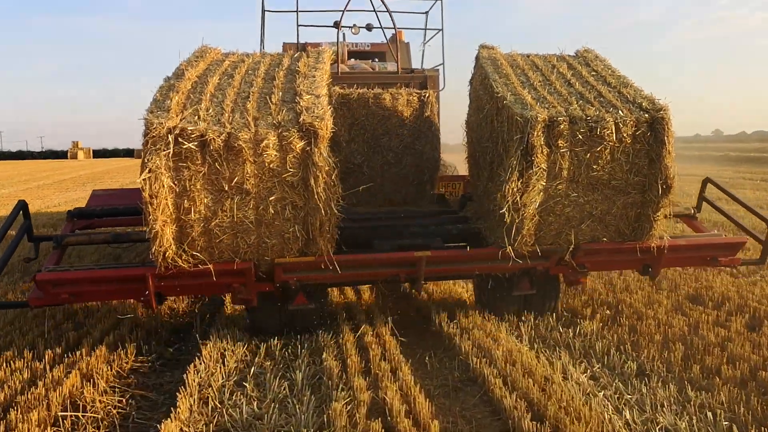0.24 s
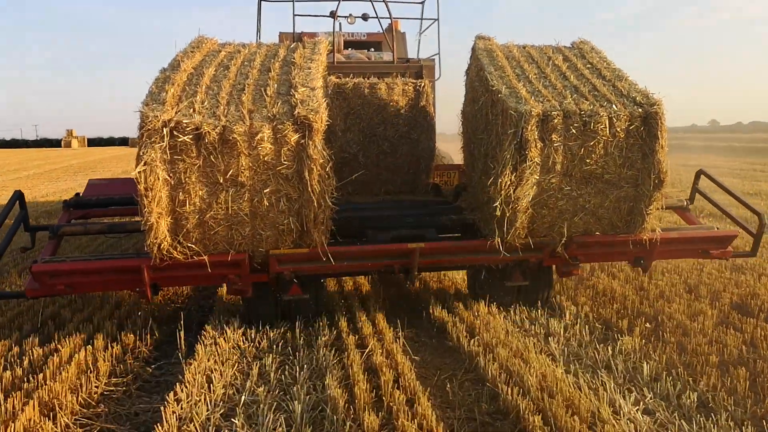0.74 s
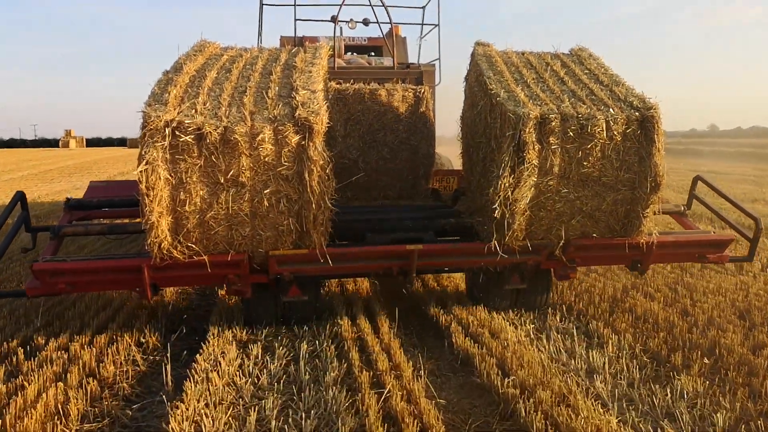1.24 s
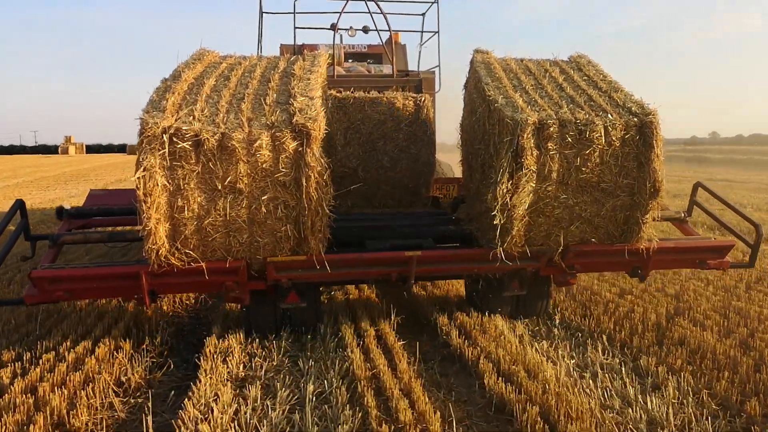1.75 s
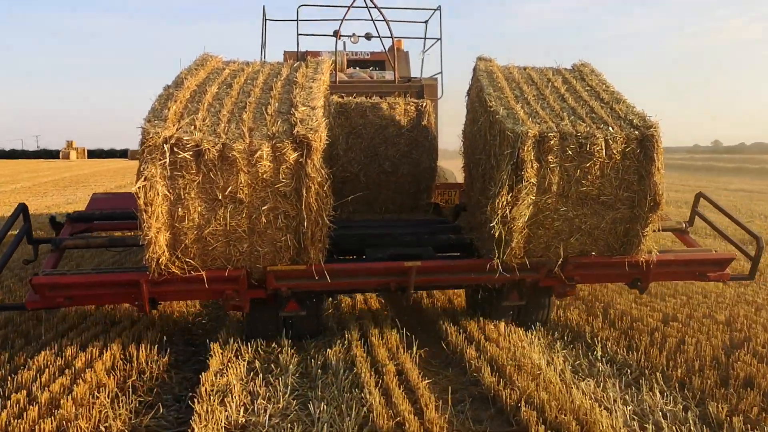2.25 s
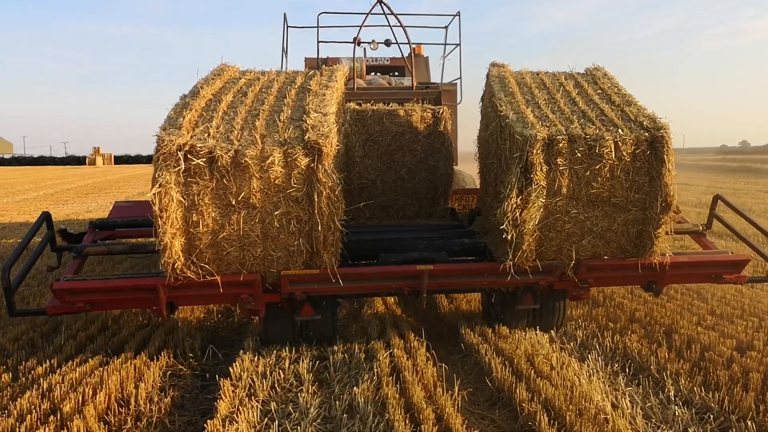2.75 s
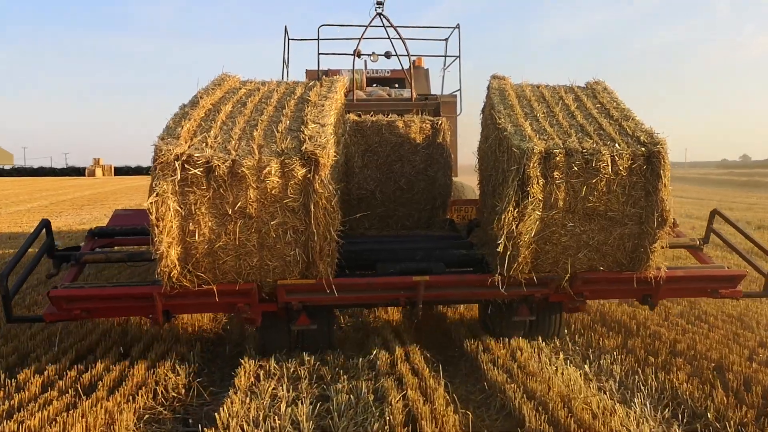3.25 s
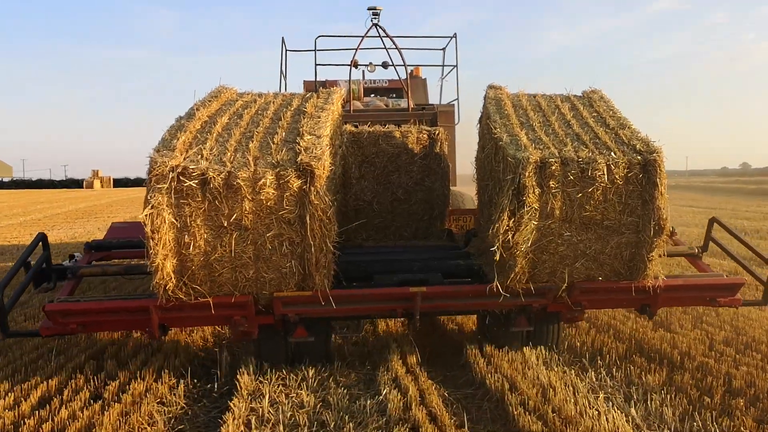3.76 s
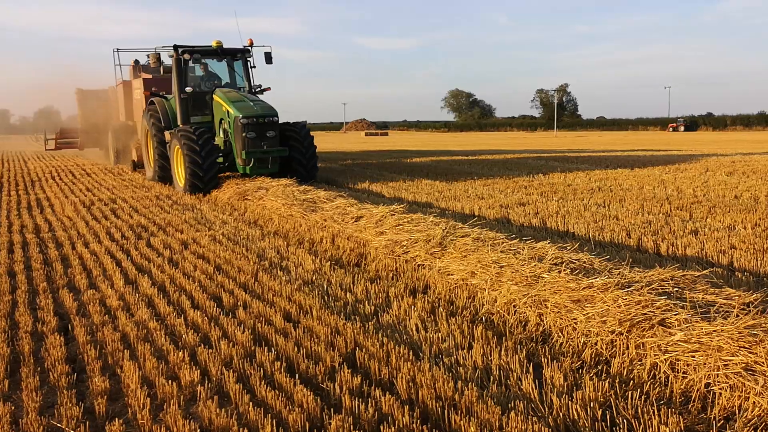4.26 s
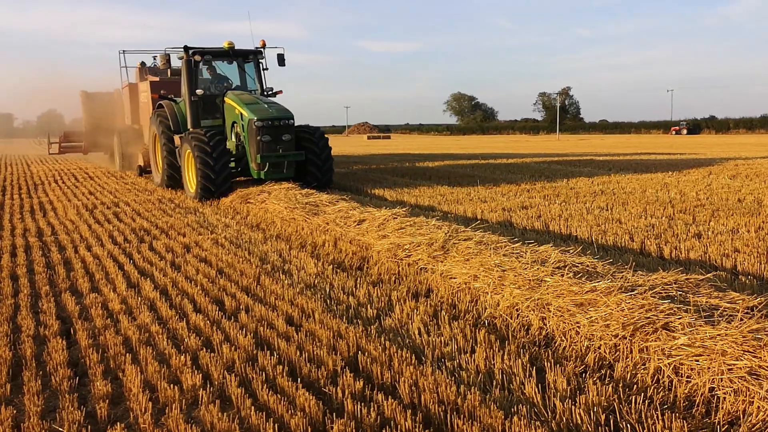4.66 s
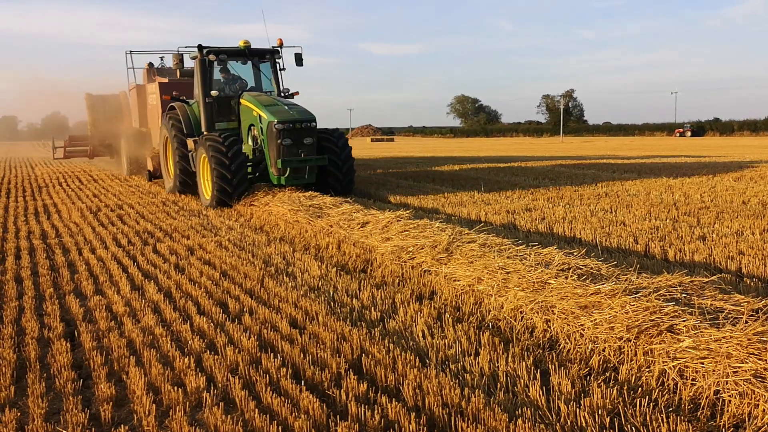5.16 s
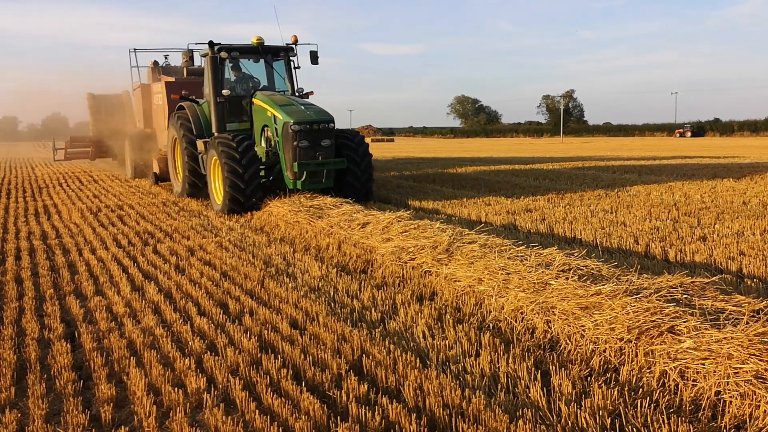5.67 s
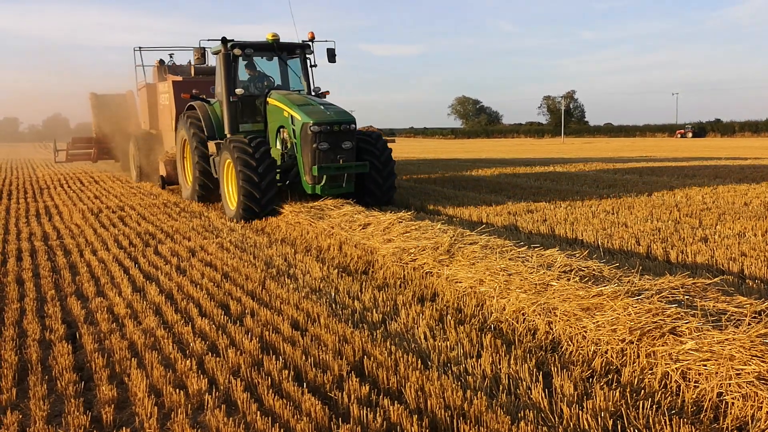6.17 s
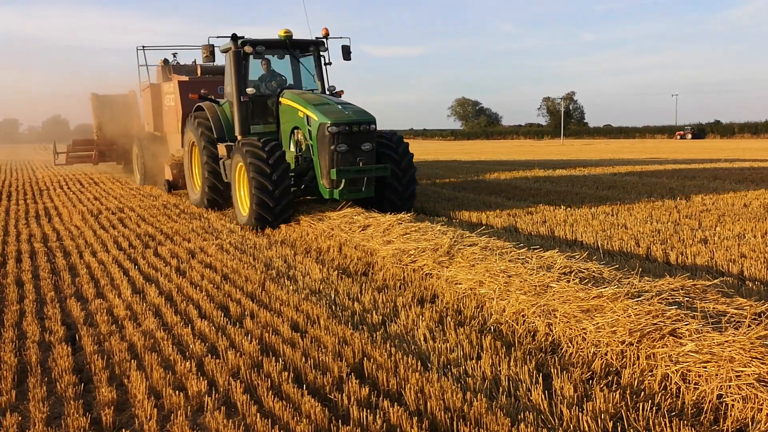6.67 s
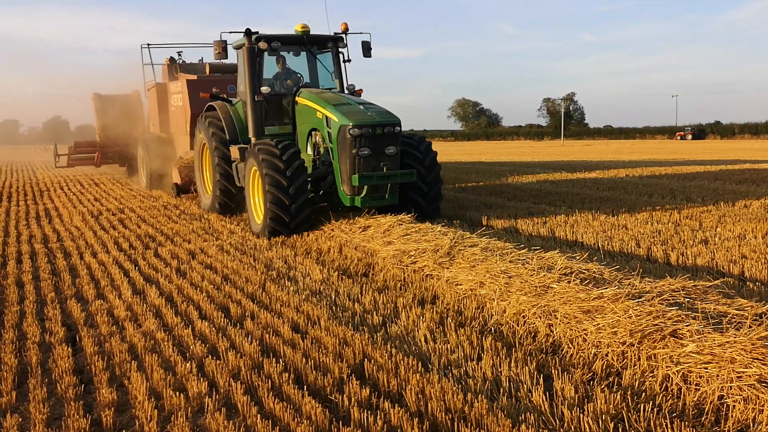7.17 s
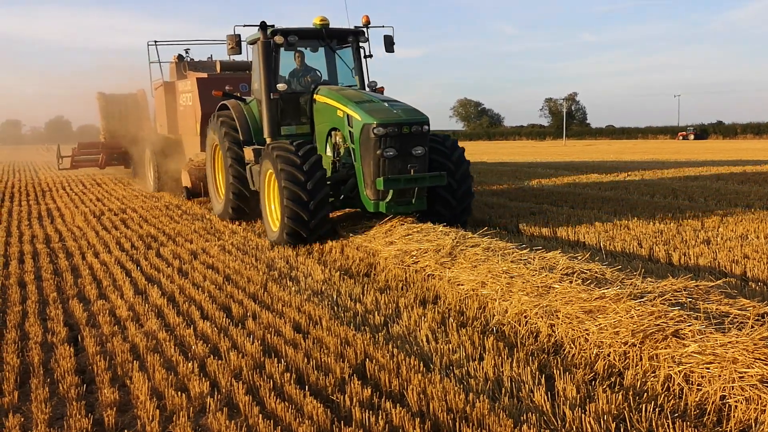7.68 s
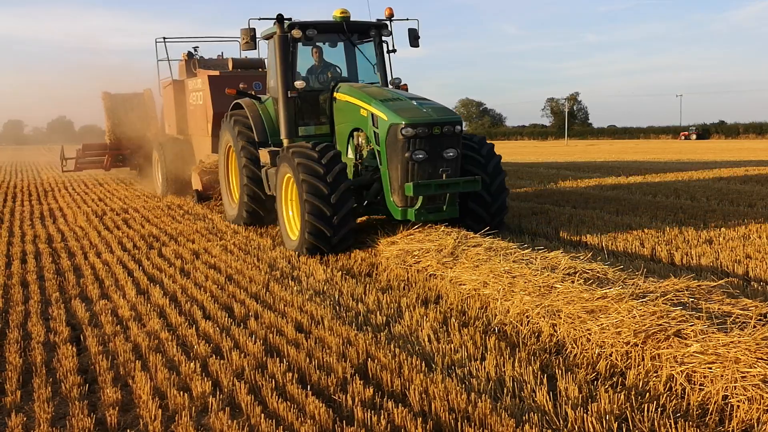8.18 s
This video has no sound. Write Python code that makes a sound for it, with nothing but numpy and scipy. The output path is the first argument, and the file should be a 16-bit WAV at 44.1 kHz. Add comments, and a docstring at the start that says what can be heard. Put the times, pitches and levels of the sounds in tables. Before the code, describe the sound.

From 0 to 4.1 s the listener is behind a baler in an open stubble field. Dry straw crackles in soft strokes roughly every 0.55 s, with small tufts, sharp ticks and brief chute scrapes, over steady chain whirr, a faint low engine note and fluttering wind rumble. A dull thump comes at 0.5 s; at 1.6-1.8 s heavy plunger thuds and clanking sheet metal burst out, with lesser knocks near 2.1 s, and another hard blow at 4.0 s. At 4.1 s a small click and abrupt change: a tractor from ahead, rapid six-cylinder diesel clatter, hum, gear and pump whine, less wind. Around 6.1-6.6 s it strains, pitch sagging into a loud growl with belt squeal, then recovers. It nears, brighter and louder, the hum beating slowly after 7 s, and begins sagging again by 8.4 s.

```python
"""Square baler and tractor in a stubble field

Behind the baler in light wind, straw is raked in strokes: grains of noise crackle under each stroke's envelope.
About every two seconds the plunger rattles the sheet metal, modelled as noise and damped sine blows.
After a click the tractor is heard from ahead: bursts of noise at the firing rate make a six-cylinder clatter.
Crank-locked partials hum, whine and growl, sagging in pitch under each plunger stroke; the turbo whistles.
Direct and scattered sound reach two ports, of which the left hears a later, duller treble."""
import sys
import numpy as np
from scipy import signal
from scipy.fft import rfft, irfft
from scipy.io import wavfile
from scipy.ndimage import uniform_filter1d

SR = 44100
rng = np.random.default_rng(int(sys.argv[2]) if len(sys.argv) > 2 else 0)


def file_out(sig):
    """Save sig as 16-bit WAV at sys.argv[1]."""
    # one column per channel
    cols = np.atleast_2d(sig).T
    # limit, then scale
    lim = np.clip(cols, -1, 1)
    pcm = np.round(lim * 32767).astype(np.int16)
    wavfile.write(sys.argv[1], SR, pcm)


N = 371763
TIME = np.arange(N) / SR
FREQS = np.fft.rfftfreq(N, 1 / SR)
AHEAD_FROM_S = 4.123  # until then the listener is behind the baler
TOP_HZ = 15400  # upper limit of the whole sound

# relative spectra of the layers: [f/Hz, level/dB]
CHAIN_SPECTRUM = [(350, 2.5), (550, -18), (800, -7), (1200, -14), (1750, -6), (2250, -12.5), (2900, -9.5),
                  (3700, -19), (4800, -18), (6200, -16), (7500, -8), (8500, -18), (11000, -37),
                  (15000, -52)]
STRAW_SPECTRUM = [(1200, -16), (1800, -11), (2500, -2.5), (3500, -8), (5000, -4.5), (5900, 0), (7400, -3.5),
                  (8400, -19.5), (9400, -16), (10200, -23), (14500, -23)]
PANEL_SPECTRUM = [(350, -4), (550, -24), (750, -9), (1150, -17), (1500, -9.5), (1800, 3), (2150, -4.5),
                  (2500, -6), (3500, -29), (5000, -13.5)]
BLOCK_SPECTRUM = [(600, -21.5), (720, -11.5), (930, -6.5), (1250, -11), (1410, -21.5), (1600, -2.5),
                  (1780, 2.5), (1980, -1), (2180, -8), (2340, -36), (2580, -35), (3000, -31)]
HISS_SPECTRUM = [(2800, 5.5), (3400, -8), (4000, 2), (4600, -7), (5200, -3), (6200, -2.5), (7200, -4),
                 (8500, -9.5), (9500, -12), (10500, -21.5), (12500, -25), (15000, -30.5)]
RUMBLE_SPECTRUM = [(20, 0), (45, -0.5), (80, -7), (130, -11.5), (250, -18.5), (340, -41), (450, -56.5),
                   (700, -48)]
CHASSIS_SPECTRUM = [(30, -22), (70, 1.5), (130, 2), (220, 0), (280, -1), (330, -7.5), (400, -4.5),
                    (480, -12), (600, -31)]

# strokes of the tines: [t/s, relative straw level/dB, rise/s, fall/s, relative level of later buffeting/dB]
STROKES = [(.19, -35, 0.14, 0.11, -7), (0.698, -35.5, 0.1, 0.083, -9.5),
           (1.265, -39.5, 0.078, 0.062, -14.5), (1.758, -35, 0.1, 0.1, -7.5),
           (2.33, -42.5, 0.13, 0.063, -12), (2.88, -34.5, 0.083, 0.082, -9.5),
           (3.43, -39, 0.042, 0.065, -16.5), (3.925, -35.5, 0.059, 0.12, -10.5)]
# loose tufts of straw dropping back between strokes: [t/s, half-length/s, relative level/dB]
TUFTS = [(0.343, 0.037, -39.5), (0.9, .04, -50), (1.138, 0.021, -44), (1.41, 0.044, -49),
         (1.913, 0.058, -42.5), (2.53, 0.051, -46.5), (2.695, 0.087, -46), (3.096, 0.062, -46),
         (3.6, 0.086, -49.5), (4.102, 0.03, -44)]
TRICKLE_DB = -55  # straw sliding between strokes, on the strokes' scale
# stalks snap in clusters: rate per second, decay, strength against the even rustle
SNAPS_PER_S, SNAP_DECAY_S, SNAP_STRENGTH = 110, .006, .8

# sheet metal shaken, hardest by the plunger: [t/s, relative level/dB, hold/s]
RATTLES = [(1.647, -36, 0.18), (2.433, -45, 0.012), (3.963, -33, 0.13)]
RATTLE_ATTACK_S, RATTLE_DECAY_S = 0.0062, 0.052
# panels stirred by the straw (against its flow), and by the ride (on the rattles' scale)
STROKE_RATTLE_DB, LOOSE_RATTLE_DB = -8.5, -51.5
# single clanks of the panels: [t/s, relative level/dB]
CLANKS = [(0.197, -35), (0.725, -40), (1.125, -43), (1.642, -33), (1.661, -26), (1.722, -25), (1.812, -28),
          (2.486, -42), (3.975, -32), (4.003, -33)]
CLANK_DECAY_S = 0.014

# plunger load on the engine heard from behind: [t/s of greatest load, share of full load]
LOADS_BEHIND = [(-0.2, 1), (1.771, 1), (4.078, 1.1)]
# exhaust note when free, its sag under full load, its level and the gain under full load
FAR_NOTE_HZ, FAR_SAG_HZ, FAR_DB, FAR_LOAD_DB = 165, 13, -36.5, 1.5
FAR_RISE_S, FAR_FALL_S = .55, .35

# dull blows of plunger and frame: [t/s, relative level/dB, f/Hz, 60 dB decay time/s]
THUMPS = [(0.497, -16, 103, 0.05), (1.269, -37, 143, 0.084), (1.57, -10.5, 99, 0.027),
          (1.712, -22.5, 226.3, 0.29), (1.736, -9, 210, 0.047), (1.813, -16, 153, 0.073),
          (2.059, -16.5, 99, 0.1), (2.199, -25.5, 242.6, 0.32), (4.024, -3, 106, 0.041),
          (4.049, -19.5, 207, 0.099)]
# sharp ticks of chains and stalks: [t/s, starting level/dB]
TICKS = [(0.0697, -27), (0.1364, -24), (0.1535, -22), (0.172, -25), (0.1974, -18), (0.6015, -28.5),
         (0.639, -21), (0.6823, -27), (1.2078, -23.5), (1.751, -12.5), (1.7873, -19), (2.1295, -35),
         (2.4882, -25), (2.7916, -27), (2.8092, -22), (2.876, -29), (3.0945, -32), (3.366, -24),
         (3.4341, -29), (3.8865, -18.5), (3.935, -22), (3.9659, -25), (3.993, -20)]
# straw scraping the chute: [t/s, length/s, resonance f/Hz, width/Hz, level/dB]
SCRAPES = [(.21, 0.1, 2510, 330, -39), (0.345, 0.05, 2780, 900, -41.5), (0.706, 0.084, 2230, 330, -44),
           (1.264, 0.092, 2350, 330, -39), (2.323, 0.054, 2420, 330, -40), (2.753, 0.39, 2820, 600, -43.5),
           (4.053, 0.11, 2900, 900, -37), (0.326, 0.08, 6500, 1000, -36), (0.696, 0.066, 5550, 1400, -32),
           (2.72, 0.35, 6600, 1000, -48), (3.936, 0.069, 5860, 1300, -29)]

# wind rumble and slow buffeting, relative levels; the rumble wanders by RUMBLE_LUMP_DB
RUMBLE_BEHIND_DB, RUMBLE_AHEAD_DB, RUMBLE_LUMP_DB = -26, -35.5, 2.3
BUFFET_BEHIND_DB, BUFFET_AHEAD_DB = -19.5, -30
BUFFET_AFTER_S, BUFFET_LENGTH_S = 0.24, 0.12  # buffeting that follows each stroke
# brief surges of the low rumble, the last two being dull plunger thuds just before its load: [t/s, half-
# length/s, level/dB]
GUSTS = [(0.06, 0.32, -35), (0.608, 0.032, -44), (1.064, 0.054, -24), (1.27, 0.091, -24),
         (1.825, 0.11, -29), (2.406, 0.069, -27), (2.955, 0.047, -28), (3.464, 0.019, -36),
         (3.61, 0.019, -35), (4.045, 0.045, -24.5), (5.98, 0.11, -31), (8.3, 0.048, -31)]

# plunger load on the engine heard from ahead: [t/s of greatest load, share of full load]
LOADS_AHEAD = [(4.04, .93), (6.36, 1), (8.67, 1)]
# crank speed between strokes (turns per second), and its fractional sag under full load
CRUISE_HZ, SAG_SHARE, LOAD_RISE_S, LOAD_FALL_S = 34.35, .074, .26, .16
# the tractor nears: [t/s, engine reference level/dB, relative fan and tyre hiss level/dB, nearness 0-1]
APPROACH = [(4.15, -33, -44, 0), (4.6, -32.5, -42, 0), (6.25, -31.5, -42, 0.33), (6.8, -28, -40.5, 0.6),
            (7.6, -28.5, -41, 0.88), (8.43, -27.5, -37.5, 0.92)]
# relative strength of each cylinder's knock: [level/dB]
CYLINDERS = [-0.61, -0.11, 0.071, -0.087, -0.6, -0.37]
# exhaust tones: [multiple of crank speed], then [level/dB above the engine reference]
EXHAUST_ORDERS = [3, 3.5, 5, 5.5, 6, 7, 9, 12, 13]
EXHAUST_DB = [-18, -13.5, -10, -17, -16, -21, -18.5, -26, -25]
# timing gear tones: [multiple of crank speed], then [level/dB above the clatter]
GEAR_ORDERS = [19.5, 27, 32.5]
GEAR_DB = [-32, -25.5, -26]
# narrow rings of covers on the block: [f/Hz at cruising speed, width/Hz, relative level/dB]
BLOCK_RINGS = [(1655, 50, -11), (1732, 30, -6.5), (1860, 45, -7.5), (1950, 60, -12), (2090, 70, -15)]
RING_DRIFT, RING_SWELL_DB = .008, 3.5  # fractional drift in pitch, swing in level
# ringing metal parts, others facing the listener as they near: [f/Hz, width/Hz, level/dB far, level/dB close]
CASINGS = [(2593, 220, -88, -30.5), (2900, 230, -51, -74), (4570, 520, -49, -37.5), (3520, 300, -56, -43),
           (5040, 240, -49, -52), (5440, 250, -47, -48), (5800, 260, -49.5, -45), (7000, 430, -63, -42),
           (7280, 350, -49, -56), (7800, 450, -55.5, -43.5), (14800, 700, -82, -60)]
CHASSIS_DB = -3  # chassis rumble above the engine reference
HISS_LOAD_DB, CHASSIS_LOAD_DB, THROB_LOAD_DB = 4, 3, -9  # change of each layer at full load

# the silencer's resonance, excited by crank orders: [multiple of crank speed], then [relative level/dB]
BOOM_ORDERS = [10, 10.5, 11]
BOOM_DB = [-10, -6, -16]
SILENCER_HZ, SILENCER_WIDTH_HZ = 348, 18
# swell at full load; rushing gas on the same scale as the boom's orders
BOOM_LOAD_DB, SILENCER_RUSH_DB = 7.5, -15.5

# the belt-driven fan's hum: [t/s, level/dB]
HUM_LEVEL = [(4.16, -24.5), (4.4, -26), (4.7, -29.5), (5.2, -26.5), (5.7, -29), (6.1, -21), (6.4, -21.5),
             (6.65, -23), (7.1, -25.5), (7.6, -22.5), (8.43, -21.5)]
# the hum slips below an exhaust tone and beats with it: [t/s, slip f/Hz]
SLIP = [(6.95, .9), (7.15, 2.85)]
# that tone's multiple of crank speed, its level against the hum, and the time of one crest
BEAT_ORDER, BEAT_DB, BEAT_CREST_S = 4.5, -9.5, 7.69
# low throb of the fan shaft when the engine is free: [t/s, level/dB]
THROB_LEVEL = [(4.4, -30), (4.78, -33), (5.07, -28), (6.1, -27), (7.0, -31), (7.55, -25), (7.95, -29),
               (8.43, -25)]

# the hydraulic pump's whine: [t/s, level/dB]
PUMP_LEVEL = [(4.15, -44), (4.5, -52), (4.9, -46), (5.35, -41), (5.8, -44.5), (6.1, -35), (6.25, -54),
              (6.44, -55), (6.53, -36), (6.78, -44), (7.05, -37), (7.25, -39.5), (7.38, -48), (7.6, -41),
              (7.9, -43), (8.35, -37.5)]
# the whine's upper overtones: [t/s, relative level/dB]
OVERTONE_LEVEL = [(4.15, -50), (6.5, -46), (7.1, -39), (7.5, -33.5), (8.0, -38), (8.3, -46)]
VANES_PER_TURN, PUMP_ROUGH = 19, .5  # vane strokes per crank turn, roughness 0-1

# growl under load: [multiple of crank speed], then [level/dB against the growl]
LOAD_ORDERS = [5.5, 6, 6.5, 7.5, 13.5, 14, 15, 18.5]
LOAD_DB = [-20, 0, -21, -19, -26, -26, -30, -36]
# growl gain added at full load, gain when free, power of the load by which it grows, and lag
GROWL_DB, GROWL_IDLE_DB, GROWL_POWER, GROWL_LAG_S = -15.6, -44, 2.3, .04
# its octave, mainly near full load: level against the growl, power of growth, roughness 0-1
OCTAVE_DB, OCTAVE_POWER, OCTAVE_ROUGH = -8, 4.6, .35
SQUEAL_FROM_S = 5.4  # the belts are heard only once the tractor is nearer
# the turbo's whistle: [t/s, amplitude level/dB]
TURBO_LEVEL = [(4.15, -68), (4.8, -58.5), (6.8, -57.5), (8.43, -62)]
TURBO_HZ, TURBO_RISE_HZ = 10050, 1350
TURBO_LAG_S, TURBO_UP_S, TURBO_DOWN_S = 0.13, 0.39, 1

# treble shading of the left port: [f/Hz, left minus right level/dB]
SHADE = [(200, 4.5), (460, -4), (600, 1), (850, -17), (1150, -5.5), (1500, -4), (1900, -18.5), (2400, -6.5),
         (3400, -6.5), (4400, -7.5), (5500, -11.5), (7800, -21), (10000, -13), (15000, -5.5)]
# scattered sound in the left port's treble: [f/Hz, share of power 0-1]
SCATTER = [(250, .02), (400, .04), (520, .7), (700, .3), (830, .65), (1000, .12), (1700, .1), (1900, .45),
           (2200, .3), (3200, .75), (6000, .9)]
# phase by which the left port trails the right: [f/Hz, lag/rad]
PORT_LAG = [(100, 0), (350, .7), (750, 1.8), (900, 4.8), (1350, 5.3), (1500, 6.5), (1800, 6.7), (2050, 9.4),
            (2650, 9.8), (3500, 13), (5000, 18.8), (8000, 28), (15000, 53)]


def undb(db):
    """Level is logarithmic: converts decibels to an amplitude gain."""
    return 10 ** (np.asarray(db) / 20)


def unit(x):
    """Normalisation: equal mean power gives every signal an rms of 1."""
    return x / np.sqrt(np.mean(x ** 2))


def curves(table):
    """Linear interpolation in time: each column of a table, sample by sample."""
    s, *columns = np.transpose(table)
    return [np.interp(TIME, s, c) for c in columns]


def across(points):
    """Logarithmic frequency scale: joins (f, value) points along it."""
    hz, value = np.transpose(points)
    return np.interp(np.log(FREQS + 1e-3), np.log(hz), value)


def colour(x, points):
    """Linear filtering: shapes a spectrum that falls away beyond its end points; rms 1."""
    low_skirt = 1 + (points[0][0] / (FREQS + 1e-3) / 1.2) ** 8
    high_skirt = 1 + (FREQS / points[-1][0] / 1.2) ** 12
    response = undb(across(points)) / np.sqrt(low_skirt * high_skirt)
    return unit(irfft(rfft(x) * response, N))


def noise():
    """White noise: independent Gaussian samples have equal mean power at all frequencies."""
    return rng.standard_normal(N)


def band(hz, width_hz):
    """Resonance: a narrow passband selects noise near its centre; rms 1."""
    response = 1 / (1 + (2 * (FREQS - hz) / width_hz) ** 4)
    return unit(irfft(rfft(noise()) * response, N))


def wander(rate_hz):
    """Slow random modulation: twice-smoothed random steps with a spread near 1."""
    k = int(SR / rate_hz)
    steps = np.repeat(rng.standard_normal(N // k + 1), k)
    return 1.298 * uniform_filter1d(uniform_filter1d(steps, k), k)[:N]


def grains(rate, spread_db):
    """Shot noise: tiny impacts at random moments and of unequal size; rms 1."""
    struck = rng.random(N) < rate / SR
    size = undb(spread_db * np.clip(noise(), -2, 2))
    return unit(struck * np.sign(noise()) * size)


def turns(hz):
    """Phase is the integral of frequency: revolutions made so far."""
    return np.cumsum(hz) / SR


def tones(angle, orders, levels_db, waver):
    """Shaft orders: partials locked to rotation, each wavering in size and phase."""
    total = np.zeros(N)
    for order, db in zip(orders, levels_db):
        size = undb(db) * np.sqrt(2) * (1 + waver * wander(12))
        phase = 2 * np.pi * (order * angle + rng.random()) + waver * wander(12)
        total += size * np.sin(phase)
    return total


def swell(s, rise_s, fall_s):
    """Gaussian envelope: a smooth hump of height 1 that peaks at time s."""
    return np.exp(-((TIME - s) / np.where(TIME < s, rise_s, fall_s)) ** 2)


def add(track, s, sound):
    """Superposition: mixes a sound in at time s."""
    i = int(s * SR)
    track[i:i + len(sound)] += sound[:N - i]


def straw_flow():
    """Mass flow: each stroke sweeps a wad in, and tufts fall in between."""
    wads = sum(undb(db) * swell(s, rise, fall) for s, db, rise, fall, _ in STROKES)
    tufts = sum(undb(db) * swell(s, length, length) for s, length, db in TUFTS)
    return wads + tufts


def snaps():
    """Fracture: each cluster of breaking stalks starts at once and decays exponentially."""
    kicks = np.abs(grains(rate=SNAPS_PER_S, spread_db=3.5))
    decay = np.exp(-1 / (SNAP_DECAY_S * SR))
    clusters = unit(signal.lfilter([1], [1, -decay], kicks))
    return unit(1 + SNAP_STRENGTH * clusters)


def straw(flow):
    """Fracture and friction: irregular impacts and noise crackle in proportion to the flow."""
    crackle = colour(grains(rate=4500, spread_db=14) + 1.2 * noise(), STRAW_SPECTRUM)
    return crackle * snaps() * flow * undb(5.0)


def shaking():
    """Forced vibration: panels start quickly, chatter while pushed, then settle exponentially."""
    total = np.zeros(N)
    for s, db, hold in RATTLES:
        attack = np.clip((TIME - s) / RATTLE_ATTACK_S, 0, 1)
        decay = np.exp(-np.maximum(TIME - s - hold, 0) / RATTLE_DECAY_S)
        total += undb(db) * attack * decay
    return total


def clanks():
    """Impulsive excitation: each clank jolts the panels at once and dies quickly."""
    return sum(undb(db) * (TIME >= s) * np.exp(-np.abs(TIME - s) / CLANK_DECAY_S) for s, db in CLANKS)


def panels(flow):
    """Contact chatter: loose sheet metal is excited by plunger, straw and ride, adding in power."""
    driven = shaking() + undb(STROKE_RATTLE_DB) * flow
    shake = np.hypot(driven, undb(LOOSE_RATTLE_DB + 0.42 * wander(10.5)))
    chatter = colour(grains(rate=700, spread_db=3.5) + .5 * noise(), PANEL_SPECTRUM)
    return chatter * np.hypot(shake, clanks()) * undb(4.5 + 2.2 * wander(45))


def chains():
    """Repeated contact: small impacts and noise make a nearly steady running sound."""
    running = colour(grains(rate=1200, spread_db=-0.5) + noise(), CHAIN_SPECTRUM)
    return running * undb(-44.0 + 0.24 * wander(3.46))


def far_tractor():
    """Harmonic radiation: the distant exhaust sounds crank orders that sag under load."""
    load = sum(share * swell(s, FAR_RISE_S, FAR_FALL_S) for s, share in LOADS_BEHIND)
    crank = turns((FAR_NOTE_HZ - FAR_SAG_HZ * load) / 5)  # the note is the fifth crank order
    note = tones(crank, [5, 6, 10], [0, -12, -18], waver=0.25)
    return note * unit(1 + .45 * wander(35)) * undb(FAR_DB + FAR_LOAD_DB * load)


def blows():
    """Damped free vibration: blows ring the frame briefly; chains and snapping stalks tick above."""
    thuds, ticks, t = np.zeros(N), np.zeros(N), TIME[:SR // 3]
    for s, db, hz, t60 in THUMPS:
        envelope = undb(db + 4 - 60 * t / t60) * (1 - np.exp(-t / 0.001))
        add(thuds, s, envelope * np.sin(2 * np.pi * hz * t))
    for s, db in TICKS:
        add(ticks, s, undb(db - 60 * t / 0.02))
    tick_spectrum = [(1500, -0.5), (3000, -11.0), (6500, 11.0), (9000, -18.5), (15000, -16.5)]
    return thuds + ticks * colour(noise(), tick_spectrum)


def baler():
    """Superposition: raked straw, chattering panels, chains, distant tractor and blows add linearly."""
    flow = np.hypot(straw_flow(), undb(TRICKLE_DB + 3 * wander(16)))
    return straw(flow) + panels(flow) + chains() + far_tractor() + blows()


def chute():
    """Friction-excited resonance: each wad of straw rubs the chute, swelling and fading."""
    total = np.zeros(N)
    for s, length, hz, width, db in SCRAPES:
        total += band(hz, width) * undb(db) * np.exp(-2 * ((TIME - s) / length) ** 2)
    return total * undb(2 * wander(70))


def wind():
    """Turbulence: air buffets about ten times a second over rumble that is mostly common to the ports."""
    behind = TIME < AHEAD_FROM_S
    buffet = undb(np.where(behind, BUFFET_BEHIND_DB, BUFFET_AHEAD_DB))
    for s, _, _, _, db in STROKES:
        buffet = buffet + behind * undb(db) * swell(s + BUFFET_AFTER_S, BUFFET_LENGTH_S, BUFFET_LENGTH_S)
    buffet = uniform_filter1d(buffet, SR // 20)
    rumble_db = np.where(behind, RUMBLE_BEHIND_DB, RUMBLE_AHEAD_DB) + RUMBLE_LUMP_DB * wander(14)
    gusts = sum(undb(db) * swell(s, length, length) for s, length, db in GUSTS)
    eddies = unit(np.sin(2 * np.pi * turns(10 + 1.926 * wander(10))))
    shared, own = colour(noise(), RUMBLE_SPECTRUM), colour(noise(), RUMBLE_SPECTRUM)
    # the ports' own part has opposite sign in each
    rumble = shared + undb(-15.0) * own * np.array([[1], [-1]])
    return eddies * buffet * undb(-3.0) + rumble * (undb(rumble_db) + gusts)


def click():
    """Impulse response: three short damped modes click once as the view changes."""
    out, t = np.zeros(N), TIME[:SR // 20]
    rings = [(1050, -13, .008), (1720, -6.5, .009), (3000, -20, .003)]  # [f/Hz, level/dB, t60/s]
    for hz, db, t60 in rings:
        add(out, AHEAD_FROM_S, undb(db - 60 * t / t60) * np.sin(2 * np.pi * hz * t))
    return out


def engine_state():
    """Torque balance, simplified: crank speed sags in proportion to plunger load."""
    load = sum(share * swell(s, LOAD_RISE_S, LOAD_FALL_S) for s, share in LOADS_AHEAD)
    return load, CRUISE_HZ * (1 - SAG_SHARE * load)


def block_rings(crank_hz):
    """Narrow-band vibration: covers on the block follow the crank, drift in pitch and swell."""
    out = np.zeros(N)
    for hz, width_hz, db in BLOCK_RINGS:
        ring_hz = hz * crank_hz / CRUISE_HZ * (1 + RING_DRIFT * wander(4))
        angle = 2 * np.pi * turns(ring_hz)
        ring = wander(2 * width_hz) * np.sin(angle) + wander(2 * width_hz) * np.cos(angle)
        out += undb(db) * unit(ring * undb(RING_SWELL_DB * wander(5)))
    return out


def firing_bursts(crank):
    """Periodic excitation: six cylinders fire in turn, three per crank turn, each burst decaying."""
    firing = 3 * crank
    count = firing.astype(int)
    strength = undb(np.array(CYLINDERS)[count % len(CYLINDERS)] + 1.0 * noise()[count])
    return unit(strength * (3.4 + np.exp(-(firing % 1) / 0.31)))


def combustion_clatter(crank, bursts, repeat_share=0.34):
    """Cyclic and random excitation: valves repeat every two turns, combustion is new each time."""
    cycle = colour(noise(), [(1700, 0), (4000, 0)])[:SR // 17]
    repeating = np.interp(crank / 2 % 1 * len(cycle), np.arange(len(cycle)), cycle)
    valves = colour(bursts * repeating, BLOCK_SPECTRUM)
    combustion = colour(bursts * (noise() + 0.12 * grains(rate=2400, spread_db=0.0)), BLOCK_SPECTRUM)
    return np.sqrt(repeat_share) * valves + np.sqrt(1 - repeat_share) * combustion


def diesel(load, crank_hz):
    """Structure-borne sound: firing bursts shake block, chassis and casings; crank orders sing above."""
    reference_db, hiss_db, near = curves(APPROACH)
    crank = turns(crank_hz)
    bursts = firing_bursts(crank)
    clatter = combustion_clatter(crank, bursts) * undb(reference_db + 5.0)
    rings = block_rings(crank_hz) * bursts * undb(reference_db + 2.5)
    gears = tones(crank, GEAR_ORDERS, GEAR_DB, waver=0.35) * undb(reference_db + 5)
    exhaust = tones(crank, EXHAUST_ORDERS, EXHAUST_DB, waver=0.25) * undb(reference_db)
    chassis_db = reference_db + CHASSIS_DB + CHASSIS_LOAD_DB * load
    chassis = colour(bursts * noise(), CHASSIS_SPECTRUM) * undb(chassis_db)
    air = (0.57 + bursts) * noise() + 0.16 * grains(rate=320, spread_db=5)
    hiss = colour(air, HISS_SPECTRUM) * undb(hiss_db + 6.5 + HISS_LOAD_DB * load ** 2)
    casings = np.zeros(N)
    for hz, width, far_db, close_db in CASINGS:
        casings += band(hz, width) * undb(far_db + (close_db - far_db) * near)
    return clatter + rings + gears + exhaust + chassis + hiss + casings * bursts


def resonance(hz, centre_hz, width_hz):
    """Resonance curve: gain for a tone that glides through it."""
    return 1 / np.hypot(1, 2 * (hz - centre_hz) / width_hz)


def silencer(load, crank_hz):
    """Resonant amplification: crank orders boom as changing speed carries them through the resonance."""
    reference_db, _, _ = curves(APPROACH)
    boom = np.zeros(N)
    for order, db in zip(BOOM_ORDERS, BOOM_DB):
        tone = tones(turns(crank_hz), [order], [db], waver=.15)
        boom += resonance(order * crank_hz, SILENCER_HZ, SILENCER_WIDTH_HZ) * tone
    rush = undb(SILENCER_RUSH_DB) * band(SILENCER_HZ, 2 * SILENCER_WIDTH_HZ)
    return undb(reference_db + BOOM_LOAD_DB * np.sqrt(load)) * (boom + rush)


def fan(load, crank_hz):
    """Beats: a fan hum at three times the shaft's throb interferes with a nearby exhaust tone."""
    (hum_db,), (throb_db,), (slip_hz,) = curves(HUM_LEVEL), curves(THROB_LEVEL), curves(SLIP)
    exhaust, slip = BEAT_ORDER * turns(crank_hz), turns(slip_hz)
    # the two tones are in phase at the crest
    blades = exhaust - slip + np.interp(BEAT_CREST_S, TIME, slip)
    hum = np.sqrt(2) * (np.sin(2 * np.pi * blades) + undb(BEAT_DB) * np.sin(2 * np.pi * exhaust))
    throb = tones(blades / 3, [1], [0], waver=.1)
    return hum * undb(hum_db) + throb * undb(throb_db + THROB_LOAD_DB * load)


def pump(crank_hz):
    """Periodic displacement: overtones of the hydraulic pump's vane rate whine and follow the crank."""
    (whine_db,), (overtone_db,) = curves(PUMP_LEVEL), curves(OVERTONE_LEVEL)
    vanes = turns(VANES_PER_TURN * crank_hz * (1 + .0016 * wander(70)))
    low = tones(vanes, [2], [0], waver=.22) * unit(1 + PUMP_ROUGH * wander(110))
    high = tones(vanes, [3, 4], [3, -12], waver=.25)
    return low * undb(whine_db) + high * undb(overtone_db)


def growl(load, crank_hz):
    """Load-dependent radiation: crank orders, low roar and belt squeal grow as a power of load."""
    crank = turns(crank_hz)
    orders = tones(crank, LOAD_ORDERS, LOAD_DB, waver=.14)
    roar = undb(-16) * band(215, 130) + undb(-26) * band(420, 170)
    squeal = (band(6120, 300) + 0.75 * band(6900, 350)) * undb(-22.5 + 4.6 * wander(60))
    squeal = squeal * (TIME > SQUEAL_FROM_S)
    strain = np.interp(TIME - GROWL_LAG_S, TIME, load)
    octave = tones(crank, [12], [GROWL_DB + OCTAVE_DB], waver=.15)
    octave = octave * unit(1 + OCTAVE_ROUGH * wander(60)) * strain ** OCTAVE_POWER
    strength = undb(GROWL_IDLE_DB) + undb(GROWL_DB) * strain ** GROWL_POWER
    return (orders + roar + squeal) * strength + octave


def turbo():
    """Frequency and amplitude modulation: the whistle spools up after each stroke, then runs down."""
    boost = sum(swell(s + TURBO_LAG_S, TURBO_UP_S, TURBO_DOWN_S) for s, _ in LOADS_AHEAD)
    whistle = np.sin(2 * np.pi * turns(TURBO_HZ + TURBO_RISE_HZ * boost))
    # turbulent air smears the whistle into a narrow hiss
    turbulence = unit(wander(900) * undb(2.8 * wander(40)))
    return whistle * turbulence * undb(curves(TURBO_LEVEL)[0])


def tractor():
    """Superposition: the engine and its driven machines share one load and crank speed."""
    load, crank_hz = engine_state()
    engine = diesel(load, crank_hz) + silencer(load, crank_hz) + growl(load, crank_hz)
    return engine + fan(load, crank_hz) + pump(crank_hz) + turbo()


def machines():
    """Change of viewpoint: the baler from behind, then the tractor from ahead."""
    return np.where(TIME < AHEAD_FROM_S, baler() + chute(), tractor()) + click()


def ports(direct, scattered):
    """Delay, shading and scattering off stubble alter the left port's treble; the bass is shared."""
    treble = np.clip((FREQS - 220) / 150, 0, 1)
    share = treble * np.clip(across(SCATTER), 0, 1)
    late = np.exp(-1j * across(PORT_LAG))
    mixed = np.sqrt(1 - share) * rfft(direct) + np.sqrt(share) * rfft(scattered)
    left = undb(treble * across(SHADE)) * late * mixed
    return np.array([irfft(left, N), direct])


def scene():
    """Direct and scattered paths: machines drawn separately for each arrive in light wind."""
    return ports(machines(), machines()) + wind()


def record(dry):
    """Low-pass filtering: a steep elliptic filter removes the highest frequencies."""
    return signal.sosfilt(signal.ellip(10, .2, 80, TOP_HZ, fs=SR, output="sos"), dry)


dry = scene()
out = record(dry)
file_out(out)
```